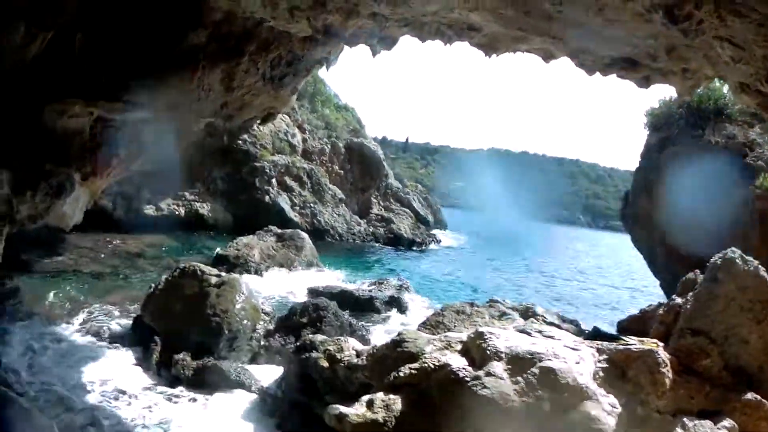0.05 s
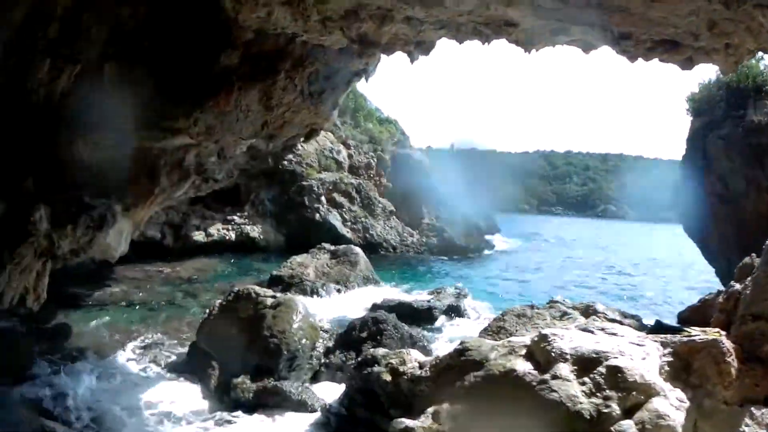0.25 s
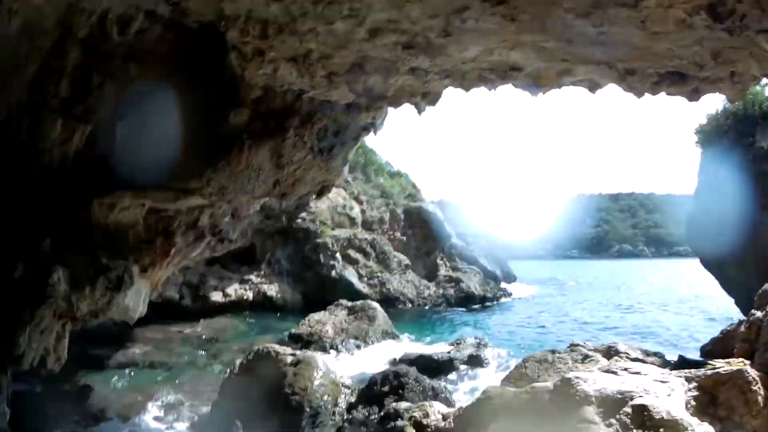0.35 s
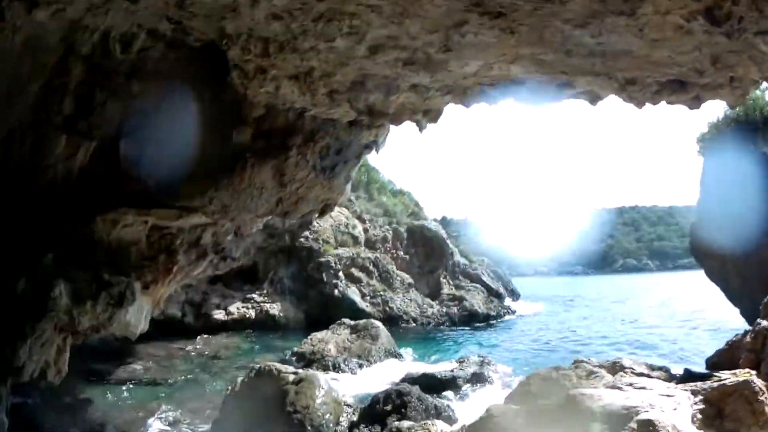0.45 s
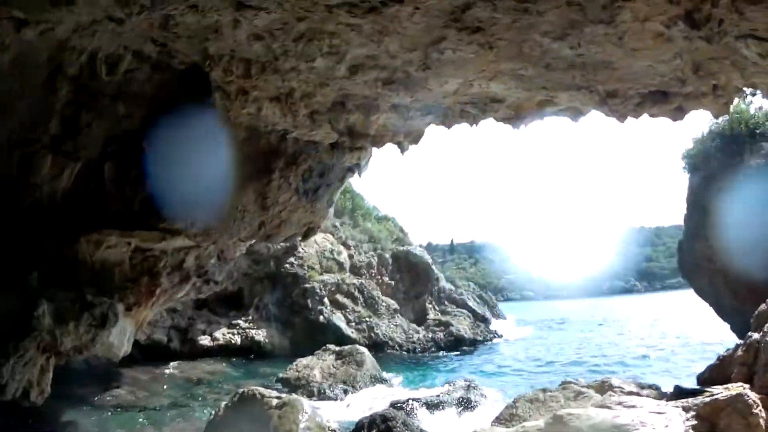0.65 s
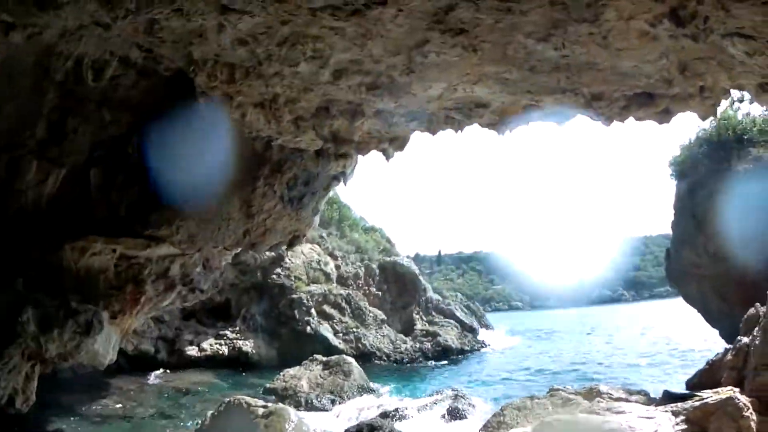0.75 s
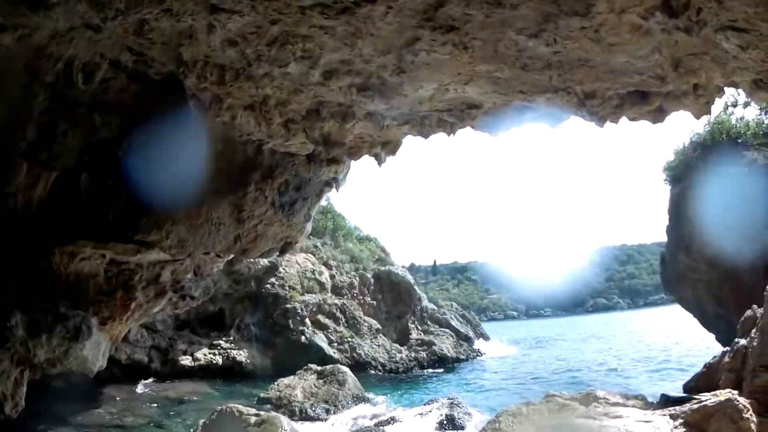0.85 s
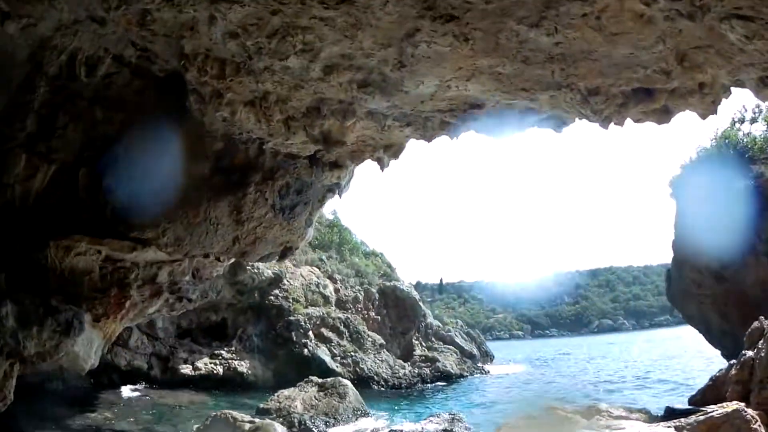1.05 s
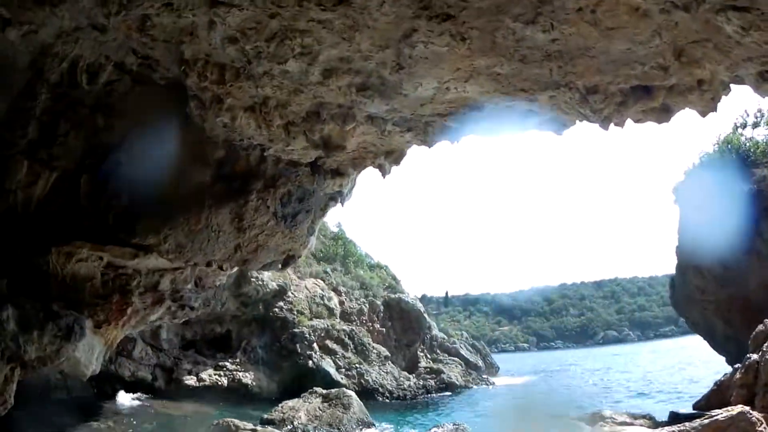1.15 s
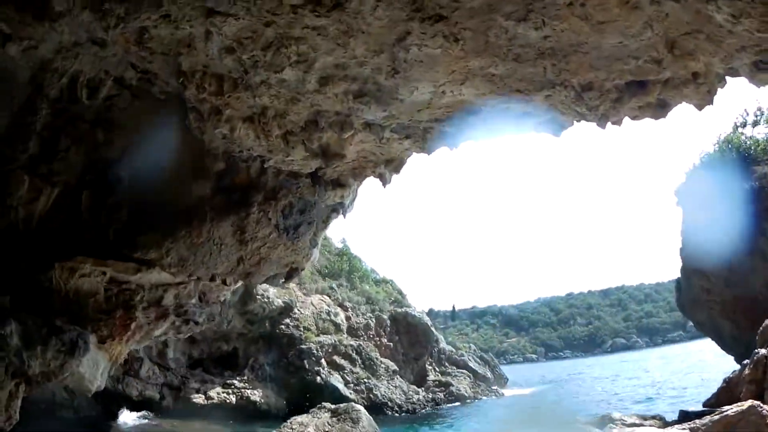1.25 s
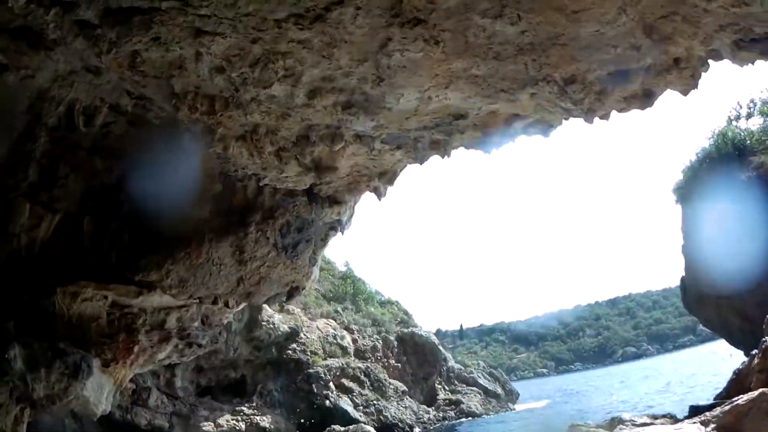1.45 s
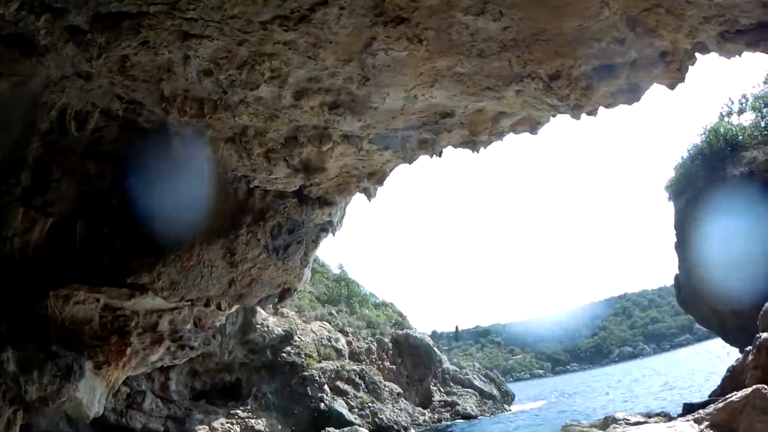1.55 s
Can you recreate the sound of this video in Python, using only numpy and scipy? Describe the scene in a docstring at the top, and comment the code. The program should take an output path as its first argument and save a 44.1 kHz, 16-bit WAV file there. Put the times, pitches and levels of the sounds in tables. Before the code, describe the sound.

Handling noise on a wet plastic camera case: fingers rumble, rub and bump right at the microphone with a few small gulps, then sharp clacks ring out. The sea washes softly farther off in a rocky cave.

```python
"""A low rumble of fingers on a wet plastic camera housing, right at the microphone, inside a sea cave.
The hand shifts: it knocks, bumps and rubs the hollow case, and trapped water gulps a few times.
The sharpest clacks ring the plastic and overload the microphone.
Farther off the sea washes softly over the rocks, coloured by the housing, and carries on
as the hand settles."""
import sys
import numpy as np
from scipy.fft import rfft, irfft, next_fast_len
from scipy.io import wavfile
from scipy.ndimage import map_coordinates

SR = 44100
rng = np.random.default_rng(int(sys.argv[2]) if len(sys.argv) > 2 else 0)


def wrap_up_sound(samples):
    """Save the sound to the file named by the first command line argument, as 16-bit audio."""
    columns = np.atleast_2d(samples).T
    # keep every value between -1 and 1, then stretch to whole-number steps
    tamed = np.clip(columns, -1, 1)
    steps = np.round(tamed * 32767).astype(np.int16)
    wavfile.write(sys.argv[1], SR, steps)


N = 70560

# Rumble of the grip, on the housing itself (time [s], level [dB])
GRIP_LEVEL = [(0, -28), (.05, -30.5), (.075, -37), (.185, -35), (.205, -25.5), (.26, -24.5), (.35, -26.5),
              (.375, -16), (.46, -10.5), (.5, -23), (.555, -26.5), (.59, -49.5), (.68, -39), (.87, -42),
              (.93, -52), (1.6, -74)]
# Finger strokes on the case (peak time [s], width [s], level [dB])
SCUFF_STROKES = [(0.211, 0.0078, -23.5), (0.237, 0.0059, -29), (0.329, 0.017, -23.5), (0.371, 0.005, -29),
                 (.381, 0.011, -27), (.474, .008, -28), (0.695, 0.013, -29), (.762, 0.0045, -30)]
SCRAPE_STROKES = [(.2102, 0.0038, -20.5), (.773, .003, -25.5), (.787, 0.0043, -28.5)]
# Colours of the handling noise (frequency [Hz], level [dB])
RUMBLE_SPECTRUM = [(15, -20.5), (28, 11), (45, 5.5), (80, 3.5), (130, 2.5), (220, -5), (300, -8),
                   (450, -16.5), (900, -23), (3000, -49), (16000, -87)]
SCUFF_SPECTRUM = [(200, -10), (700, 2), (1300, 1.5), (1700, -3), (2300, -38), (3100, -17.5), (4200, -27),
                  (5200, -44), (9000, -48.5), (16000, -59)]
SCRAPE_SPECTRUM = [(2200, -34), (2850, 3), (3300, -14), (3700, -2.5), (4500, -22), (5300, -52)]

# Surges of the wash and its fizz, off in the cave (time [s], relative level [dB])
WASH_LEVEL = [(0, -37), (.55, -37), (.72, -36), (.92, -38.5), (1.0, -34), (1.06, -37.5), (1.12, -34),
              (1.22, -36), (1.33, -37.5), (1.47, -38.5), (1.58, -35.5)]
FIZZ_LEVEL = [(0, -57.5), (.85, -57), (.98, -45.5), (1.15, -52), (1.3, -48), (1.48, -50), (1.58, -43.5)]
# Their colours from inside the housing (frequency [Hz], level [dB])
WASH_SPECTRUM = [(20, 9.5), (42, -4.5), (60, -9.5), (130, -15.5), (205, -3), (350, -9), (600, -6.5),
                 (1100, -5), (1500, -4), (1850, -12.5), (2600, -18.5), (3500, -23), (4100, -17),
                 (5600, -32), (6500, -26.5), (8400, -32), (10000, -22.5), (13000, -19.5), (15400, -29),
                 (16200, -62)]
FIZZ_SPECTRUM = [(1500, -34), (4000, -10.5), (6600, -6.5), (8300, -10), (10000, 2), (15300, -0.5),
                 (16200, -46)]
# Resonances of the housing, heard in the wash (centre [Hz], half-width [Hz], relative level [dB])
HOUSING_BANDS = [(820, 19, -17), (1090, 66, -7), (2892, 137, -12.5), (3190, 120, -19)]

# Sharp knocks on the case (time [s], level [dB], main-mode pitch [factor], deep-mode gain [dB],
# middle-mode gain [dB], high-mode gain [dB], ring length [factor])
CLACK_HITS = [(.0512, 0.5, 0.93, 3.5, 3.5, -11, 0.21), (0.5558, 17, 1.02, -20.5, 3.5, -8.5, 0.8),
              (.5590, 5, 1.1, -19.5, 12.5, -13, 0.37), (.5682, -3, 0.94, 1, -2, -18, 0.83),
              (0.5726, 0.5, 1.02, -16, 3, -23, 0.92), (0.6285, 14, 0.93, 2, -3.5, 4.5, 0.54),
              (0.6315, -0.5, 0.91, -21, -10, 11, 0.67), (.6368, -15, 0.49, -12, 6, 9, 0.96),
              (.6639, 15, .955, 2, -14, -5, .48), (0.7716, 0.5, 0.95, -5.5, -25, -11, 0.58),
              (0.7756, -1, 1.01, -8, -11, -21, 0.7), (0.7826, 1.5, 0.99, 5, -15, -0.5, 0.56),
              (0.8442, -16.5, 0.83, -11, -3, -8, .6)]
# Modes of the case, before each knock scales them (frequency [Hz], level [dB], 60 dB decay [s])
CASE_DEEP = [(848, -23.5, 0.1)]
CASE_MAIN = [(1227, -12.5, 0.022), (1390, 1.5, 0.022), (1524, -29.5, 0.16), (1290, -26.5, 0.11)]
CASE_MIDDLE = [(2407, -16, 0.027), (2881, -8, 0.018), (3193, -19, 0.023)]
CASE_HIGH = [(3605, -7, 0.013), (4135, -10, 0.015), (6260, -46.5, 0.015), (7120, -49.5, 0.078)]
# Colour of the crack at each contact (frequency [Hz], level [dB])
CRACK_SPECTRUM = [(100, -20.5), (500, 1), (1300, 15), (2200, 1), (4200, -5.5), (5200, -19), (8000, -11.5),
                  (10000, -24), (16000, -27.5)]

# Soft bumps on the hollow case (time [s], level [dB], pitch [Hz])
BUMP_HITS = [(0.081, -22, 207.5), (0.218, -17, 211), (0.253, -7.5, 201.8), (0.37, -13.5, 181),
             (0.39, -13, 167.5), (.406, -10, 231.5), (0.431, -7.5, 189.2), (0.4628, 2.5, 204.4),
             (.508, -10, 192.7), (.531, -16.5, 199.8), (.560, -16.5, 212.5), (0.665, -23.5, 203),
             (.775, -29, 197), (0.869, -35.5, 196)]
# Water trapped against the case (time [s], level [dB], pitch at the peak [Hz], glide [share of pitch/s])
GULP_NOTES = [(.2235, -5, 666, 1.5), (.3128, -11, 808, -3.5), (.366, -19, 631, -3.5),
              (.463, -22.5, 619, -4)]


def amp(db):
    """Decibels to gain."""
    return 10 ** (np.asarray(db) / 20)


def unit(x):
    """x at rms 1."""
    return x / np.sqrt(np.mean(x ** 2) + 1e-20)


def curve(rows):
    """(time, value) points joined, one value per sample."""
    return np.interp(np.arange(N) / SR, *np.transpose(rows))


def wobble(knots_per_s):
    """A smooth random curve."""
    return map_coordinates(rng.standard_normal(400), [np.arange(N) * knots_per_s / SR], mode="wrap")


def filtered(x, response):
    """x through a filter whose gain is response(hz)."""
    size = next_fast_len(N + 8192)
    return irfft(rfft(x, size) * response(np.fft.rfftfreq(size, 1 / SR)), size)[:N]


def noise(spectrum):
    """Noise of rms 1 coloured by (frequency [Hz], level [dB]) points."""
    points_hz, db = np.transpose(spectrum)
    colour = lambda hz: amp(np.interp(np.log(hz + 1), np.log(points_hz), db))
    return unit(filtered(rng.standard_normal(N), colour))


def since(start):
    """Seconds since start, zero before it."""
    return np.maximum(np.arange(N) / SR - start, 0)


def swell(t, rise_s, shape):
    """A rounded envelope that peaks at rise_s and then dies."""
    return (t / rise_s * np.exp(1 - t / rise_s)) ** shape


def hand():
    """The shifting grip rumbles through the case; fingertips add dull scuffs and brighter scrapes."""
    t = np.arange(N) / SR
    out = amp(curve(GRIP_LEVEL)) * noise(RUMBLE_SPECTRUM)
    for rows, spectrum in [(SCUFF_STROKES, SCUFF_SPECTRUM), (SCRAPE_STROKES, SCRAPE_SPECTRUM)]:
        strokes = sum(amp(db) * np.exp(-.5 * ((t - peak) / width) ** 2) for peak, width, db in rows)
        grain = amp(3 * wobble(240))
        out += strokes * unit(grain * noise(spectrum))
    return out


def sea(wash_gain_db=2, droplet_db=-18.5):
    """Foam washes over the rocks in small surges, with droplets in it and a fine fizz on top."""
    ripple_db = .5 * wobble(23.76)
    foam = noise(WASH_SPECTRUM) + housing_rings() + amp(droplet_db) * droplets()
    wash = amp(curve(WASH_LEVEL) + wash_gain_db + ripple_db) * foam
    fizz = amp(curve(FIZZ_LEVEL)) * noise(FIZZ_SPECTRUM)
    return wash + fizz


def housing_rings(swell_db=1.8):
    """The housing rings in narrow resonances under the wash, each swelling and fading on its own."""
    out = np.zeros(N)
    for centre, width, db in HOUSING_BANDS:
        band = unit(filtered(rng.standard_normal(N), lambda hz: 1 / (1 + ((hz - centre) / width) ** 2)))
        out += amp(db + swell_db * wobble(22)) * band
    return out


def droplets(per_s=300, centre_hz=1170, spread_db=16, life_cycles=12):
    """Bubbles and drops in the foam ping over an octave, each rising a little in pitch; rms 1."""
    t = np.arange(2048) / SR
    out = np.zeros(N + len(t))
    for when, pitch, strength in rng.random((int(per_s * N / SR), 3)):
        hz = centre_hz * 2 ** (pitch - .5)
        age = t * hz / life_cycles
        envelope = amp(spread_db * strength) * (np.exp(-2 * age) - np.exp(-20 * age))
        start = int(when * N)
        out[start:start + len(t)] += envelope * np.sin(2 * np.pi * hz * t * (1 + 0.045 * age))
    return unit(out[:N])


def case_ring(modes, t, pitch, length, scatter_db=1.2):
    """Damped modes of the plastic, each struck a little differently every time."""
    out = np.zeros(N)
    for hz, db, t60 in modes:
        struck_db = db + scatter_db * rng.standard_normal()
        out += amp(struck_db - 60 * t / (t60 * length)) * np.sin(2 * np.pi * hz * pitch * t)
    return out


def clacks(base_attack_s=0.0014, base_crack_t60_s=0.024):
    """Hard contacts ring the case; where they land sets the share of its modes, and the grip damps them."""
    out = np.zeros(N)
    for start, db, pitch, deep_db, middle_db, high_db, length in CLACK_HITS:
        t = since(start)
        groups = [(CASE_DEEP, deep_db, 1), (CASE_MAIN, 0, pitch),
                  (CASE_MIDDLE, middle_db, 1), (CASE_HIGH, high_db, 1)]
        body = sum(amp(gain_db) * case_ring(modes, t, shift, length) for modes, gain_db, shift in groups)
        # Harder knocks are brighter and more sudden.
        crack_db = -25 + 0.93 * db
        attack_s = base_attack_s * amp(-0.22 * db)
        crack = amp(crack_db - 60 * t / (base_crack_t60_s * length)) * noise(CRACK_SPECTRUM)
        out += amp(db) * (1 - np.exp(-t / attack_s)) * (body + crack)
    return out


def bumps(rise_s=0.009, tail_db=-15.5, t60_s=0.38):
    """Soft pushes swell the case's one low resonance, which rings on briefly."""
    out = np.zeros(N)
    for start, db, hz in BUMP_HITS:
        t = since(start)
        tail = amp(tail_db - 60 * t / t60_s) * (1 - np.exp(-t / rise_s))
        out += amp(db) * (swell(t, rise_s, shape=1.56) + tail) * np.sin(2 * np.pi * hz * t)
    return out


def gulps(rise_s=0.0084, flutter_db=5):
    """Small pockets of air and water sound short, gliding, fluttering notes."""
    out = np.zeros(N)
    for start, db, hz, glide in GULP_NOTES:
        t = since(start)
        phase = 2 * np.pi * hz * t * (1 + glide * (t / 2 - rise_s))
        envelope = amp(db + flutter_db * wobble(217.5)) * swell(t, rise_s, shape=3.55)
        out += envelope * np.sin(phase)
    return out


def scene():
    """In mono: the sea off in the cave, with handling noise right at the microphone in front of it."""
    return (sea() + hand() + clacks() + bumps() + gulps())[None]


def record(dry, ceiling=0.95, hardness=27, shelf_hz=9270, shelf_db=-15, top_hz=20000):
    """The microphone clips on the loudest knocks; the recorder dulls the treble and cuts it at top_hz."""
    clipped = dry[0] / (4.5 + np.abs(dry[0] / ceiling) ** hardness) ** (1 / hardness)
    shelf = lambda hz: amp(shelf_db * (1 - 1 / (1 + (hz / shelf_hz) ** 20)))
    return filtered(clipped, lambda hz: shelf(hz) * (hz < top_hz))[None]


dry = scene()
out = record(dry)
wrap_up_sound(out)
```